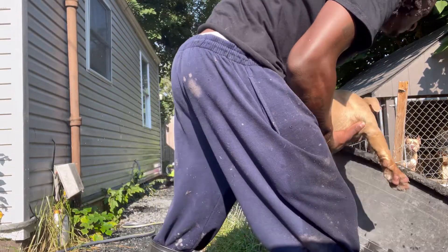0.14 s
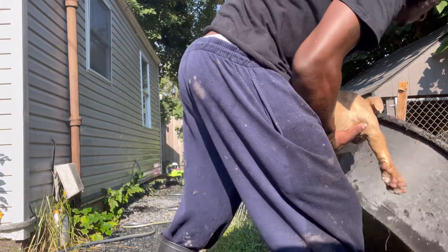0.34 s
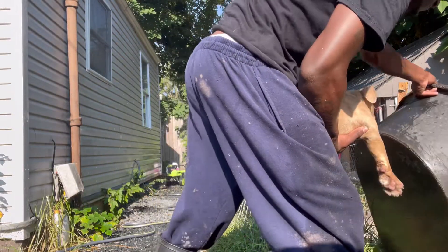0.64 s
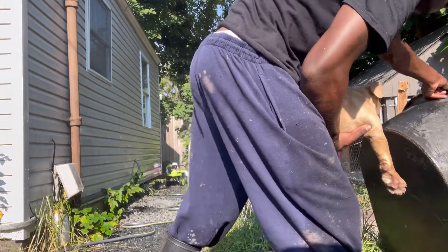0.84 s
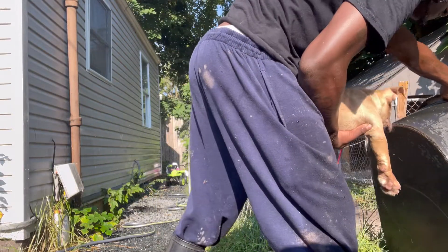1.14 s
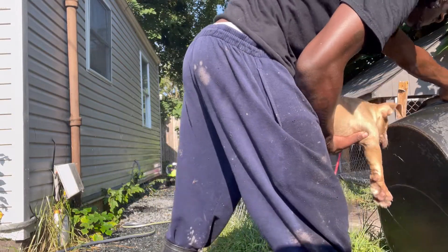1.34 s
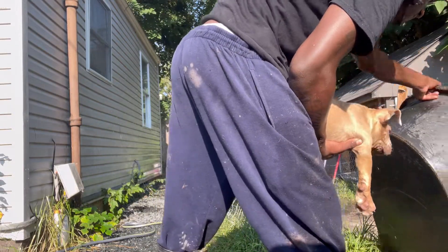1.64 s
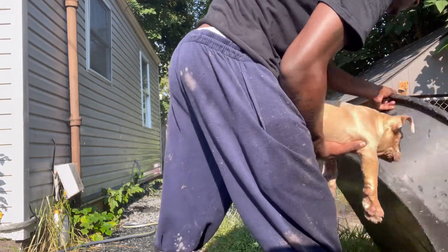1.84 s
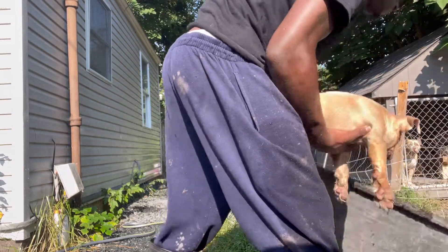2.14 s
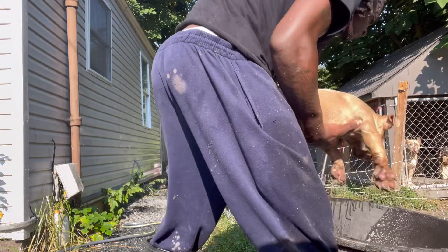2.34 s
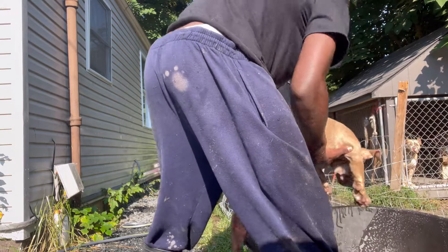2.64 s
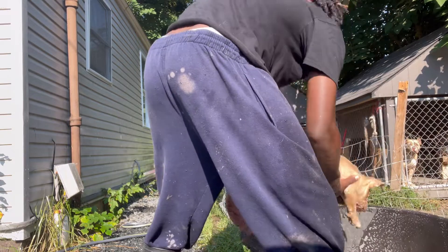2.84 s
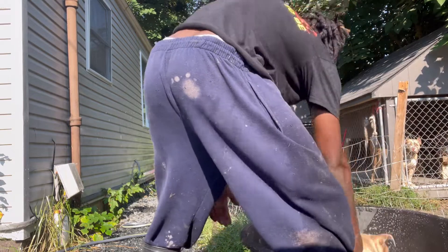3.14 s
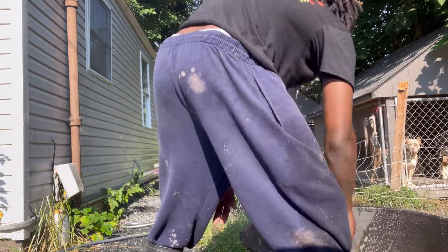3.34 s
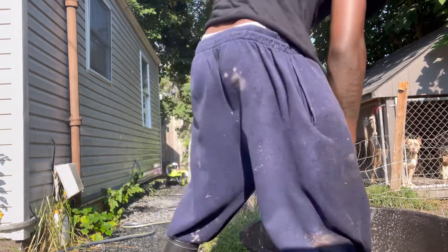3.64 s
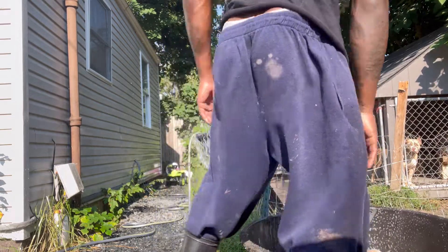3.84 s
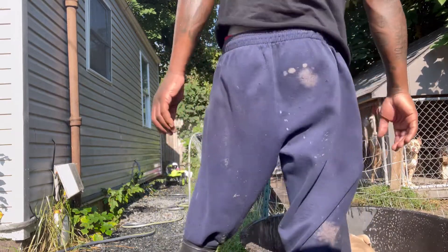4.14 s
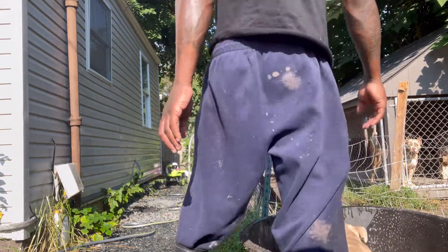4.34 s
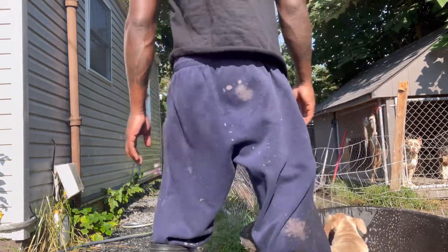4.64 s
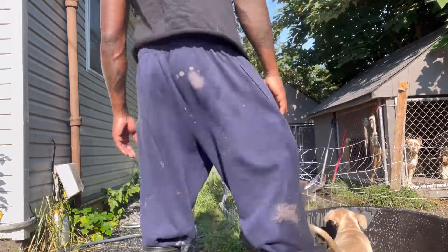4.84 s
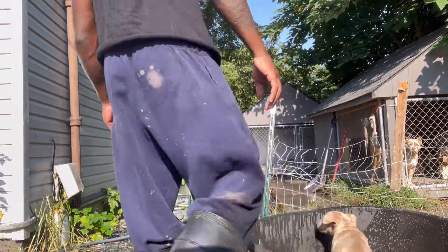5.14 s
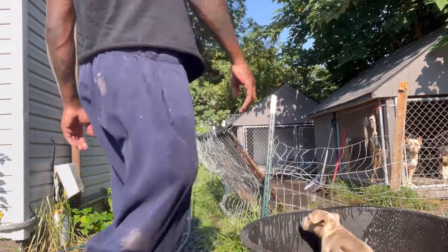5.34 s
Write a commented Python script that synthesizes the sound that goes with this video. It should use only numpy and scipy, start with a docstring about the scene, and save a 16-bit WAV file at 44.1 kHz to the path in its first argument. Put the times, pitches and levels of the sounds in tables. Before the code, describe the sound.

Close, slightly wet tub-handling sounds over distant insects and low outdoor rumble. Soft knocks and a splashy pour come within the first second, fading into lapping; a heavier set-down thud follows around the middle, then more bumps and grassy scuffs. A faint bird whistles twice, falling in pitch. Late on, water plops gently, then two knocks and a short jerky boot scrape close the scene.

```python
"""Tub of water in a summer back yard

Cicadas buzz in the trees: filtered noise for the far ones, pulse harmonics for one whining and dropping in a cycle.
Close to the microphones a tipped plastic tub slops water on the ground, made of random grains and ringing bubbles.
The tub is set down and bumped (damped ringing modes), and boots scuff the grass (short bursts of grains).
A bird out in the trees whistles twice, as a gliding sine; low outdoor rumble and a wavering hum lie beneath.
"""
import sys
import numpy as np
from scipy import signal
from scipy.fft import rfft, irfft
from scipy.io import wavfile

SR = 44100
rng = np.random.default_rng(int(sys.argv[2]) if len(sys.argv) > 2 else 0)


def file_out(sig):
    """Save sig as 16-bit WAV at sys.argv[1]."""
    # one column per channel
    cols = np.atleast_2d(sig).T
    # limit, then scale
    lim = np.clip(cols, -1, 1)
    pcm = np.round(lim * 32767).astype(np.int16)
    wavfile.write(sys.argv[1], SR, pcm)


N = 242189
T = np.arange(N) / SR
HZ = np.fft.rfftfreq(N, 1 / SR)

# spectrum of crushed grass and grit: frequency_hz, density_db (relative, per Hz)
GRIT = [(100, -8), (280, 0), (500, -1.5), (800, -0.5), (1400, -4.5), (1900, -8.5), (2600, -6.5),
        (4000, -18), (7500, -29), (9000, -43)]
# spectrum of a sole on gravel: frequency_hz, density_db (relative, per Hz)
SOLE = [(100, -3.5), (250, -2), (480, 1), (750, -6), (1400, -3.5), (2200, -13.5), (4500, -12), (7800, -16),
        (10000, -13.5)]
# the boot's drag: start, length, and time from one jerk to the next, all in s
DRAG_AT_S, DRAG_S, JERK_S = 5.311, 0.098, .034


def amp(db):
    """Decibels to gain."""
    return 10 ** (np.asarray(db) / 20)


def unit(x):
    """Scales to rms 1."""
    return x / np.sqrt(np.mean(x ** 2) + 1e-20)


def read(points, hz):
    """Reads a table by interpolating over log frequency."""
    f, value = np.transpose(points)
    return np.interp(np.log(hz + 1), np.log(f + 1), value)


def add(mix, s, sound):
    """Mixes a sound in at time s."""
    part = mix[round(s * SR):][:len(sound)]
    part += sound[:len(part)]


def drift(hz):
    """Slow chance, rms 1, up to about the given rate."""
    noise = rfft(rng.standard_normal(N))
    return unit(irfft(noise / (1 + (HZ / hz) ** 4), N))


def colour(x, points):
    """Filters a sound by a spectrum table and scales it to rms 1."""
    return unit(irfft(rfft(x) * amp(read(points, HZ)), N))


def grains(per_s, spread_db):
    """Random clicks of uneven size and either sign, at rms 1."""
    size = amp(spread_db * np.minimum(rng.exponential(1, N), 4))
    sign = rng.choice([-1, 1], N)
    return unit(size * sign * (rng.random(N) < per_s / SR))


def bursts(rows, t60, attack_s):
    """One quick rise and exponential decay for each (s, dB)."""
    out, t = np.zeros(N), np.arange(SR // 3) / SR
    for s, db in rows:
        add(out, s, amp(db - 60 * t / t60) * (1 - np.exp(-t / attack_s)))
    return out


def diffuse(gain):
    """Noise from all around, as the two microphones take it; their mean has rms 1."""
    # how alike the two microphones hear it: frequency_hz, likeness (1 = the same)
    likeness = [(60, 1), (120, 0.87), (240, 0.31), (490, 0.026), (990, 0.045), (1990, 0.034), (4020, 0.07),
                (8090, 0.1)]
    # tilt of the stereo image: frequency_hz, left_minus_right_db
    leftward = [(60, 2), (100, -1), (180, 2), (310, 2), (530, 6), (910, 0.5), (1580, 9), (2720, 2.5),
                (4690, 12.5), (8090, 1.5)]
    a, b = rfft(rng.standard_normal((2, N)))
    same = np.clip(read(likeness, HZ), -1, 1)
    lean = amp(read(leftward, HZ) / 2)
    left = a * lean
    right = (same * a + np.sqrt(1 - same ** 2) * b) / lean
    pair = irfft(np.array([left, right]) * gain, N)
    return pair / np.std(pair.mean(0))


def yard(x, wet_db, t60, left_db):
    """Direct sound plus scatter from walls and trees, different at each microphone above the bass."""
    t = np.arange(SR // 2) / SR
    echoes = rng.random((2, len(t))) < 3000 / SR  # 3000 a second
    taps = rng.standard_normal((2, len(t))) * echoes * amp(-60 * t / t60)
    taps /= np.linalg.norm(taps, axis=1, keepdims=True)
    taps = signal.sosfilt(signal.butter(1, 350, "high", fs=SR, output="sos"), taps)
    scatter = signal.fftconvolve(x[None], taps, axes=1)[:, :N]
    pair = x + amp(wet_db) * scatter
    return pair / np.sqrt(1 + amp(wet_db) ** 2 / 2) * amp([[left_db / 2], [-left_db / 2]])


def from_right(pair, lag_s):
    """Sound from the right reaches the left microphone later."""
    late_left = irfft(rfft(pair[0]) * np.exp(-2j * np.pi * HZ * lag_s), N)
    return np.array([late_left, pair[1]])


def air():
    """Low outdoor rumble and leaf hiss as diffuse noise, with a far machine's hum wavering in pitch and level."""
    # outdoor spectrum: frequency_hz, density_db (relative, per Hz)
    spectrum = [(15, -47.5), (25, -18), (45, -0.5), (95, 1.5), (149, -3.5), (200, -11), (305, -13.5),
                (333, -17.5), (381, -22), (456, -21), (1070, -24), (1160, -26.5), (1990, -30.5),
                (2600, -15.5), (5200, -25.5), (6760, -48.5), (11400, -120)]
    # the far machine: pitch_hz, level_db (before the 6.5 dB cut below)
    machine = [(59.2, -55)]
    hz, db = machine[0]
    hum_level = amp(db - 6.5 + 2 * drift(2.8))
    hum = hum_level * np.sin(2 * np.pi * np.cumsum(hz + 2.0 * drift(5.3)) / SR)
    return amp(-45.5 + 0.2 * drift(15)) * diffuse(amp(read(spectrum, HZ))) + hum


def chorus():
    """Many far insects merge into rattling noise bands, one for each kind, with nothing much above 8.3 kHz."""
    # far insects: centre_hz, width_hz (nominal, scaled by 0.64 below), level_db
    kinds = [(7502, 550, -50.5), (6530, 2160, -52), (3180, 390, -62.5), (2587, 41, -64.5)]
    out = np.zeros((2, N))
    top_cut = 1 / (1 + (HZ / 8300) ** 90)
    for hz, width, db in kinds:
        band = top_cut / (1 + ((HZ - hz) / (0.64 * width)) ** 2) ** 1.26
        out += amp(db + 0.85 * drift(3.7) + 0.61 * drift(130)) * diffuse(band)
    return out


def harmonics(pulse_hz, weight):
    """A train of tymbal clicks as harmonics {number: gain}; moving leaves fade each one on its own."""
    turns = np.cumsum(pulse_hz) / SR
    knots = np.arange(0, 6, .05)
    tone = 0
    for k, w in weight.items():
        fade = np.interp(T, knots, amp(5.22 * rng.standard_normal(len(knots)) + 3.5))
        tone = tone + w * fade * np.cos(2 * np.pi * (k * turns + rng.random()))
    return tone / np.sqrt(sum(w ** 2 for w in weight.values()) / 2)


def cicada():
    """Tymbal clicks ring a body whose resonance sinks each cycle, as a ragged whine gives way to a clean buzz."""
    # the low buzz where the body does not lift it: frequency_hz, level_db (relative)
    buzz_shape = [(2700, -26), (3140, -4.5), (3590, -1), (4040, -4.5), (4490, -2), (4930, -7.5),
                  (5380, -9.5), (5830, -1.5), (6280, 9), (6730, 7), (7180, -10)]
    first_drop_s, cycle_s = .358, .7767
    buzz_s, break_s = .145, .02  # from drop to break; fade on each side of the break
    whine_hz, whine_db, purity = 6076, -54.5, .3
    swell_db, swell_s = 6, 0.11
    sunk_hz, sunk_db, sink_s = 3897, -10.5, .02
    whine_pulses_hz, buzz_pulses_hz = 6100 / 36, 4485 / 10

    # the cycle: a whine swells, sinks into a low buzz, and breaks off
    to_break = (first_drop_s + buzz_s - T) % cycle_s
    from_drop = buzz_s - to_break
    sunk = 1 / (1 + np.exp(-(from_drop - .012) / sink_s))
    body_hz = whine_hz + (sunk_hz - whine_hz) * sunk
    db = whine_db + swell_db * np.exp(np.minimum(from_drop, 0) / swell_s) + sunk_db * sunk
    singing = np.minimum(np.minimum(to_break, cycle_s - to_break) / break_s, 1)
    whine_share = .97 - .87 * sunk

    def body(hz, width):
        """Gain of the moving resonance."""
        return 1 / np.hypot(1, (hz - body_hz) / width)

    low = {}
    for k in range(6, 17):
        hz = k * buzz_pulses_hz
        low[k] = amp(read(buzz_shape, hz)) * body(hz, 430)
    high = {k: body(k * whine_pulses_hz, 200) ** 2 for k in range(29, 40)}
    buzz = harmonics(buzz_pulses_hz * (1 + 0.00276 * drift(14)), low)
    whine = harmonics(whine_pulses_hz * (1 + 0.00224 * drift(23)), high)
    swing = 2 * np.pi * np.cumsum(body_hz) / SR
    # uneven clicks smear the resonance
    rattle = drift(420) * np.cos(swing) + drift(420) * np.sin(swing)
    ragged = purity * whine + np.sqrt(1 - purity ** 2) * rattle
    song = np.sqrt(1 - whine_share) * buzz + whine_share * ragged
    heard = singing * amp(db + 0.92 * drift(50)) * song
    return yard(heard, wet_db=-11, t60=.2, left_db=7)


def bubble(hz):
    """A trapped bubble rings for a few cycles and rises in pitch."""
    t = np.arange(int(24 * SR / hz)) / SR
    tone = np.sin(2 * np.pi * hz * t * (1 + .003 * hz * t))
    return tone * np.exp(-hz * t / 4) * (1 - np.exp(-hz * t * 2))


def bubbles(per_s):
    """Bubbles of all sizes, each size at the given rate."""
    total = np.zeros(N)
    for hz in np.geomspace(400, 2600, num=14):
        starts = grains(per_s, spread_db=4.0)
        total += signal.oaconvolve(starts, bubble(hz))[:N] * np.sqrt(hz)
    return unit(total)


def hollow(x):
    """The tub's cavity lifts a few narrow bands."""
    # cavity resonances: centre_hz, width_hz, lift_db
    resonances = [(373, 17, 2.5), (707, 48, 9), (850, 83, 2), (1070, 54, 0.5), (1193, 30, -1),
                  (1500, 84, 2), (1779, 24, 8)]
    lift_db = sum(db / (1 + (2 * (HZ - hz) / width) ** 2) for hz, width, db in resonances)
    return unit(irfft(rfft(x) * amp(lift_db), N))


def slosh():
    """Water keeps lapping in the tub, with a few clearer plops: a smack and a ringing bubble together."""
    # lapping spectrum: frequency_hz, density_db (relative, per Hz)
    lap_spectrum = [(120, -2), (260, -0.5), (500, 4), (900, -1), (1500, -1.5), (2300, -6), (4000, -22),
                    (7000, -34)]
    # water swaying before, then after the pour: time_s, level_db (before the 1.5 dB lift below)
    sway_before = [(0.0, -55.5), (0.14, -58.5), (0.4, -58), (0.5, -55.5)]
    sway_after = [(1.5, -55), (2.12, -58), (2.45, -57.5), (2.88, -62.5), (3.15, -59), (3.32, -54.5),
                  (3.64, -59), (3.8, -64.5), (4.09, -62.5), (4.37, -58.5), (4.64, -54), (4.97, -56.5),
                  (5.28, -61)]
    # plops of water: start_s, level_db, pitch_hz (as the bubble starts)
    plops = [(.652, -27.5, 4050), (.824, -29, 406), (.879, -30, 1740), (.921, -28.5, 480),
             (3.285, -32, 1450), (3.296, -35, 1005), (4.417, -38.5, 920), (4.518, -40.5, 1000),
             (4.574, -43.5, 940), (4.62, -41.5, 860), (4.688, -34.5, 570), (4.76, -35.5, 680)]
    smack_db, smack_t60_s = -1, .025  # level relative to the plop
    lapping = hollow(colour(grains(per_s=450, spread_db=3) + 0.1 * bubbles(per_s=13), lap_spectrum))
    sway_db = np.interp(T, *np.transpose(sway_before + sway_after))
    lapping = lapping * amp(sway_db + 1.5 + 2.6 * drift(13))
    smacks = bursts([(s, db + smack_db) for s, db, _ in plops], smack_t60_s, attack_s=.0004)
    lapping += smacks * colour(rng.standard_normal(N), GRIT)
    for s, db, hz in plops:
        add(lapping, s, amp(db) * bubble(hz))
    return from_right(yard(lapping, wet_db=-0.5, t60=0.06, left_db=2.0), lag_s=0.00015)


def touches():
    """Yields each knock and its rebound, if it has one: (s, dB, Hz, crunch dB)."""
    # the tub's knocks: start_s, level_db, lowest_mode_hz, crunch_db (grit under it, before the gain in scuffs),
    # rebound (0-1, amplitude of the second touch)
    blows = [(.621, -21.5, 186, -44, 0.01), (.669, -25, 163, -37.5, 0.01), (.751, -28.5, 230, -44, 0.01),
             (1.076, -31, 136, -48, 0.06), (1.841, -42, 292, -36.5, 0.1), (2.243, -34.5, 272, -43.5, 0),
             (2.32, -38.5, 305, -46, 0.1), (2.52, -32.5, 457, -32, 0.36), (2.537, -24, 66.6, -52, 0),
             (2.558, -21.5, 202, -44, 0), (2.572, -32, 403, -46, 0), (3.144, -25.5, 185, -41.5, .5),
             (3.262, -30.5, 280, -36, .95), (3.669, -35, 280, -35, .2), (5.409, -27.5, 142, -27.5, 0),
             (5.438, -25.5, 356, -41, 0.03)]
    rebound_s = .0285  # from the first touch to the second
    for s, db, hz, crunch_db, rebound in blows:
        yield s, db, hz, crunch_db
        if rebound > 0:
            loss = 20 * np.log10(rebound)
            yield s + rebound_s, db + loss, hz, crunch_db + loss


def scuffs():
    """Rim and boots crush grass and grit in short bursts of grains, alone and under each knock."""
    # light scuffs on grass: start_s, level_db (before the 3.5 dB gain below)
    light = [(.142, -41.5), (1.776, -42.5), (2.185, -44.5), (2.398, -38.5), (2.505, -36.5), (3.305, -37.5),
             (3.39, -43.5), (3.488, -39.5), (4.608, -41.5), (4.79, -41), (5.381, -35.5)]
    under_knocks = [(s, db) for s, _, _, db in touches()]
    press = bursts(light + under_knocks, t60=0.059, attack_s=0.0026)
    crunch = amp(3.5) * press * colour(grains(per_s=2300, spread_db=3.5), GRIT)
    return from_right(yard(crunch, wet_db=-2.0, t60=0.21, left_db=4.0), lag_s=0.0002)


def surge(crest_s, db, rise, fade):
    """From the start of the pour, a gain that climbs to a crest and dies away, both at a steady rate in dB."""
    pour_at_s, attack_s = 0.534, .03
    running = np.clip((T - pour_at_s) / attack_s, 0, 1)
    return running * amp(db - rise * np.maximum(crest_s - T, 0) - fade * np.maximum(T - crest_s, 0))


def water():
    """A sheet of water runs from the tipped tub in uneven gulps, slaps the ground and breaks into spray."""
    # spectra of the slap and of the spray: frequency_hz, density_db (relative, per Hz)
    slap_spectrum = [(80, -31), (130, -7), (190, -2), (260, -8), (340, -4.5), (560, -6), (850, -3.5),
                     (1150, -2.5), (1400, -6), (1900, -9.5), (2600, -19), (3600, -37.5)]
    spray_spectrum = [(1100, -14.5), (1700, -1.5), (2200, 1.5), (3300, -1.5), (4200, -3), (5200, -10.5),
                      (7800, -10.5), (9000, -41)]
    # flow of the sheet and of its spray: crest_s, level_db, rise_db_per_s, fade_db_per_s
    sheet_flow = (.635, -30.5, 181, 26.5)
    spray_flow = (.88, -42, 22.5, 18)
    slap = grains(per_s=2200, spread_db=3.5) + 0.12 * bubbles(per_s=44)
    slap = hollow(colour(slap, slap_spectrum))
    spray = colour(grains(per_s=680, spread_db=2.0), spray_spectrum)
    slap = slap * surge(*sheet_flow) * amp(1.5 * drift(30))
    spray = spray * surge(*spray_flow) * amp(1.5 * drift(25))
    pair = yard(slap, wet_db=-1.5, t60=0.034, left_db=1.5)
    pair = pair + yard(spray, wet_db=-1.5, t60=0.056, left_db=5.5)
    return from_right(pair, lag_s=0.00026)


def knocks():
    """Soft blows ring the damped plastic; its pitch depends on where it is met."""
    # modes of the tub: ratio (multiple of the lowest mode), level_db (relative)
    modes = [(1, 0), (1.55, -9), (2.4, -13), (3.7, -23.5), (6.3, -22.5)]
    ring_t60_s, ring_hz, ring_slope = 0.081, 200, .5  # decay at this pitch; higher knocks die sooner
    out, t = np.zeros(N), np.arange(SR // 4) / SR
    for s, db, hz, _ in touches():
        t60 = ring_t60_s * (ring_hz / hz) ** ring_slope
        ring = np.zeros(len(t))
        for ratio, level in modes:
            decay = amp(level - 60 * t * ratio ** 0.11 / t60)
            ring += decay * np.sin(2 * np.pi * hz * ratio * t)
        add(out, s, amp(db) * ring * (1 - np.exp(-t / 0.0013)))
    return from_right(yard(out, wet_db=-6.0, t60=0.06, left_db=0), lag_s=0.00026)


def ticks():
    """Single stones snap against plastic, and under the sole at each jerk, as very short noise bursts."""
    # sharp ticks of grit: start_s, level_db (at the start)
    stones = [(.784, -30), (2.52, -32.5), (4.652, -44)]
    jerk_tick_db = -35
    jerks = [(s, jerk_tick_db) for s in DRAG_AT_S + np.arange(0, DRAG_S, JERK_S)]
    snap = bursts(stones + jerks, t60=0.022, attack_s=.0001)
    return yard(snap * colour(rng.standard_normal(N), SOLE), wet_db=-7.5, t60=.1, left_db=-5.5)


def bird():
    """A thin, rough falling whistle, blurred and broken by the trees."""
    # bird whistles: start_s, length_s, level_db
    whistles = [(1.792, .3, -52), (4.659, .3, -50)]
    # course of one whistle: share (0-1 of its length), pitch_hz, level_db (relative)
    slur = [(0, 3270, 1), (.25, 3284, -12.5), (.5, 3190, 0.5), (.75, 3000, -3.5), (1, 2940, 2)]
    out = np.zeros(N)
    share, hz, db = np.transpose(slur)
    for s, length, level in whistles:
        u = np.linspace(0, 1, int(length * SR))
        pitch = np.interp(u, share, hz) * (1 + 0.0193 * drift(110)[:len(u)])
        tone = np.sqrt(2) * np.sin(2 * np.pi * np.cumsum(pitch) / SR)
        loudness = amp(level + np.interp(u, share, db))
        add(out, s, tone * loudness * signal.windows.tukey(len(u), .15))
    return yard(out * amp(2.6 * drift(25)), wet_db=0.5, t60=.5, left_db=2.0)


def boot():
    """A rubber sole close by drags over gravel, catching in small jerks at a steady rate, then comes to rest."""
    drag_db, attack_s, fade_db_per_s = -40.3, .006, 140
    jerk_db = 5.5  # fall in level over each jerk
    t = T - DRAG_AT_S
    jerk = jerk_db * (.5 - t / JERK_S % 1)
    db = drag_db + jerk - fade_db_per_s * np.maximum(t - DRAG_S, 0)
    level = np.clip(t / attack_s, 0, 1) * amp(db + 1.4 * drift(90))
    scrape = level * colour(grains(per_s=1800, spread_db=2.5), SOLE)
    return yard(scrape, wet_db=-4.5, t60=0.23, left_db=15.0)


def scene():
    """Insects and bird far off, tub and boots near."""
    far = air() + chorus() + cicada() + bird()
    near = slosh() + scuffs() + water() + knocks() + ticks() + boot()
    return far + near


def record(dry):
    """The microphone's colour and the band limit at 10 kHz."""
    # response of the microphone: frequency_hz, gain_db
    response = [(10, -37.5), (28, -12), (45, 0), (8100, 0.5), (8450, -2), (10000, -24)]
    heard = irfft(rfft(dry) * amp(read(response, HZ)), N)
    lowpass = signal.firwin(255, 10000, window=("kaiser", 8), fs=SR)
    return signal.oaconvolve(heard, lowpass[None], "same")


dry = scene()
out = record(dry)
file_out(out)
```